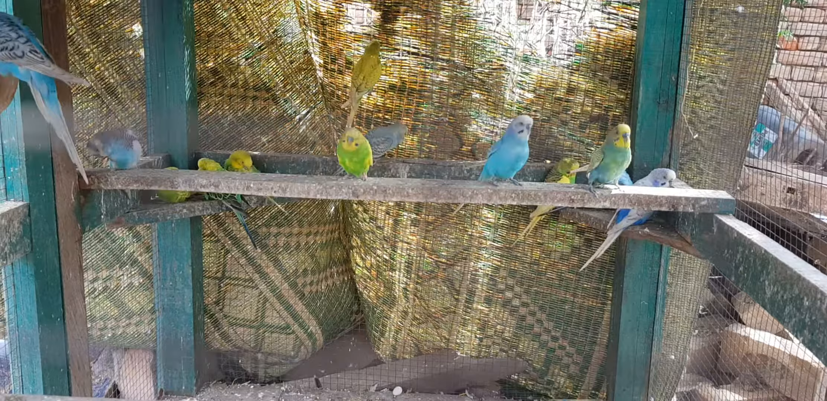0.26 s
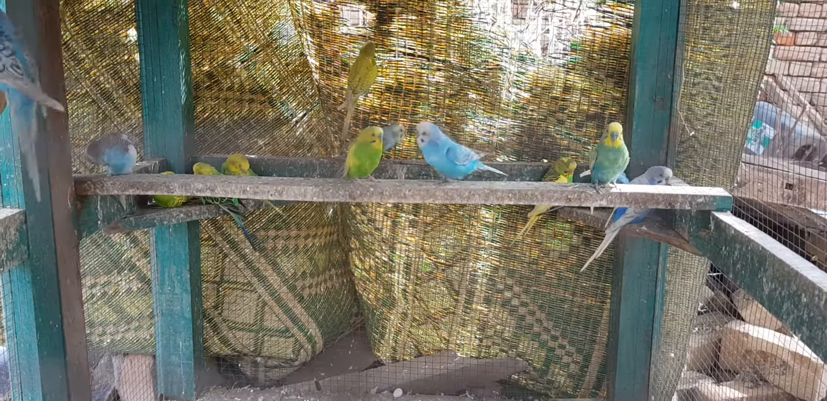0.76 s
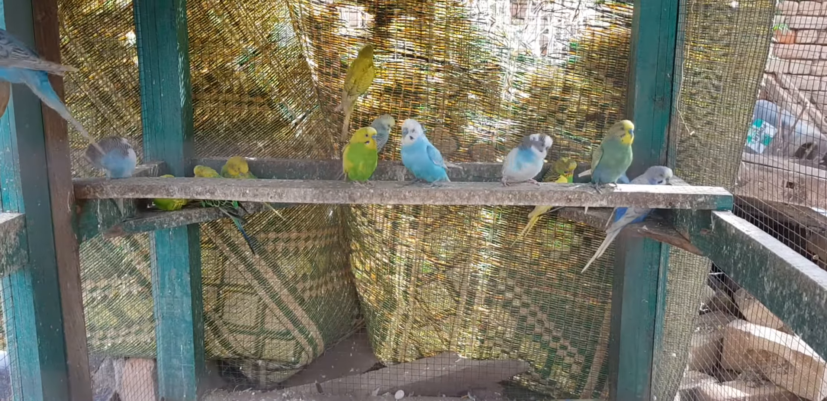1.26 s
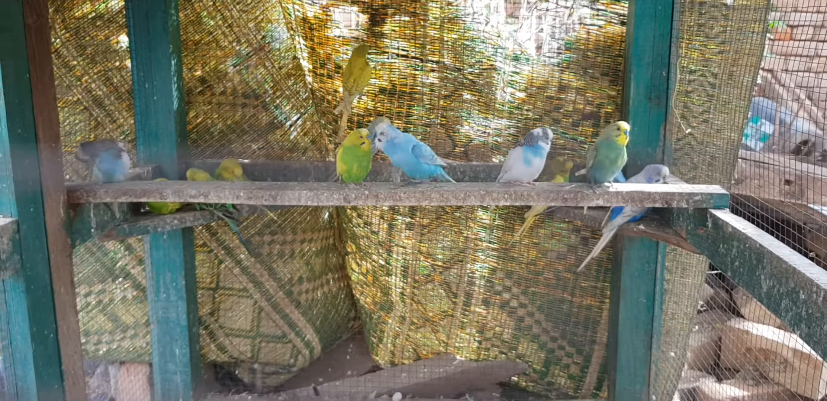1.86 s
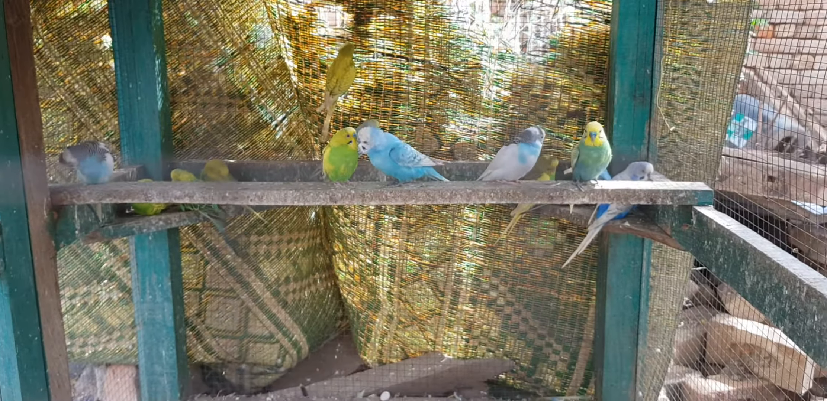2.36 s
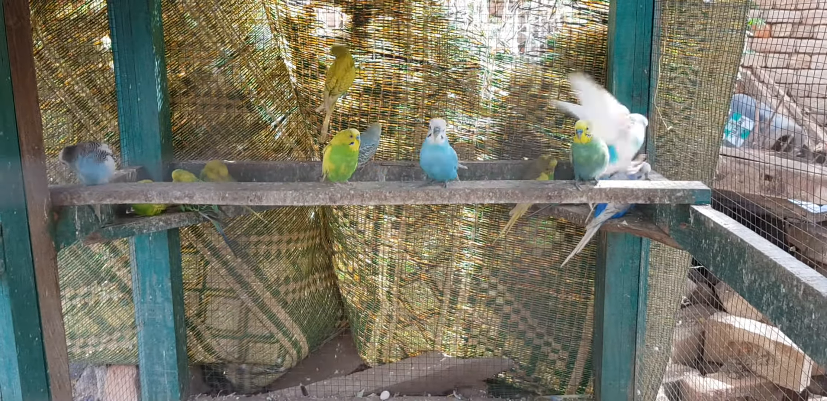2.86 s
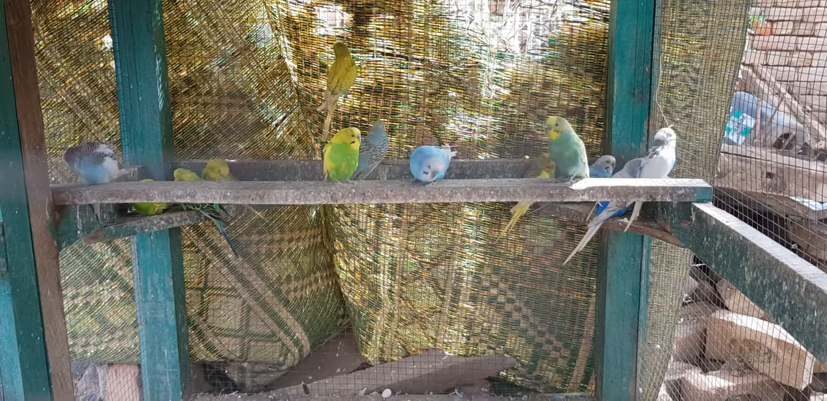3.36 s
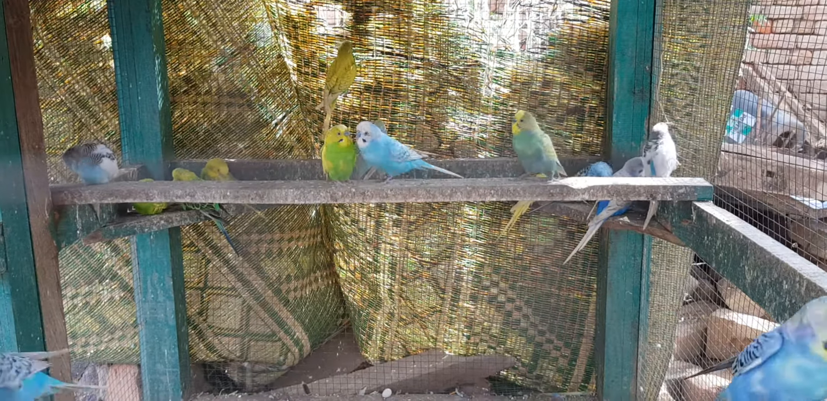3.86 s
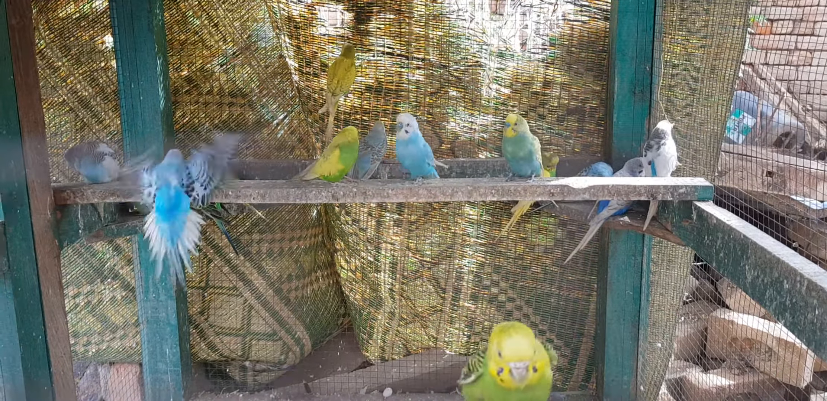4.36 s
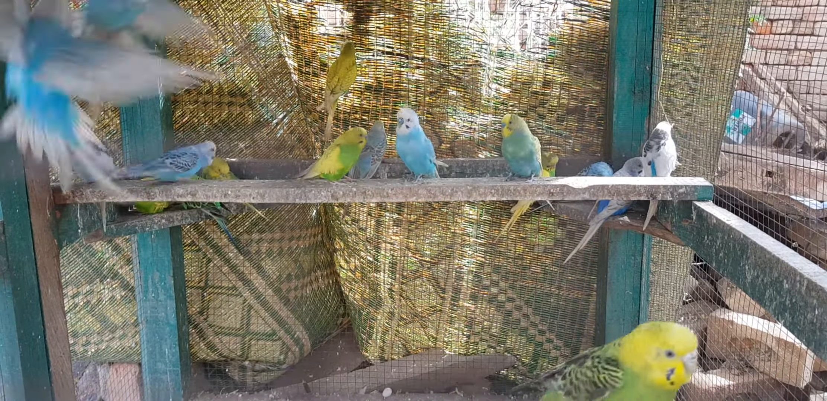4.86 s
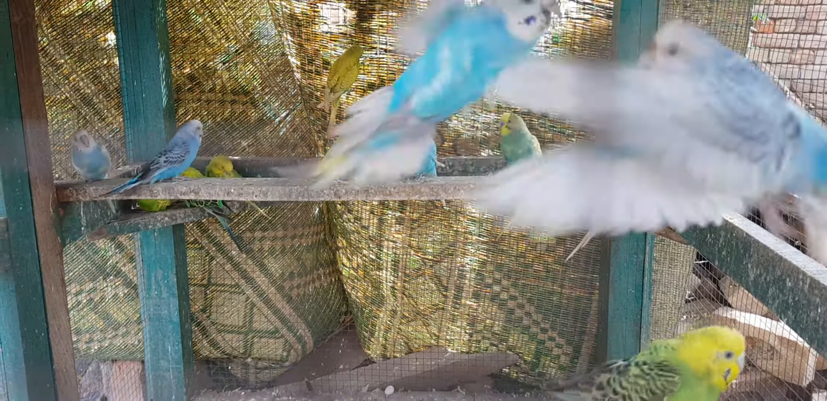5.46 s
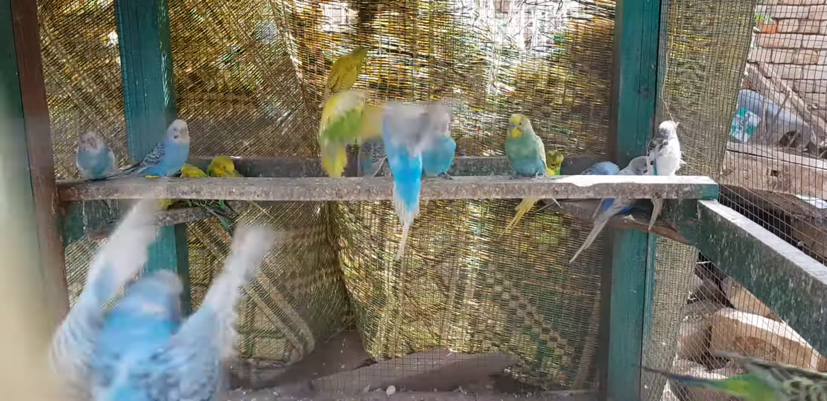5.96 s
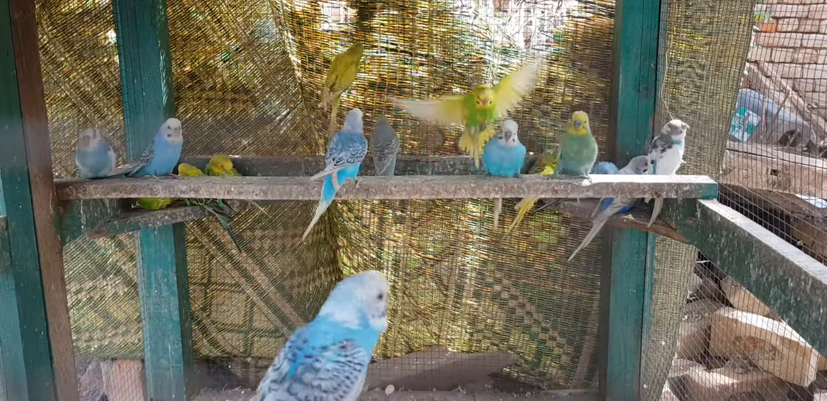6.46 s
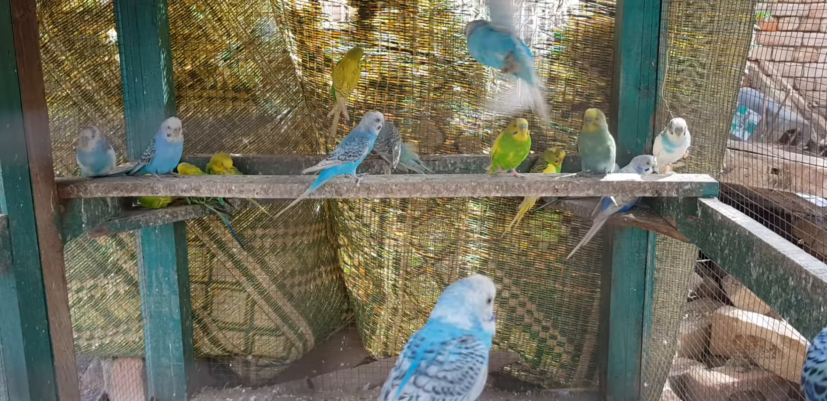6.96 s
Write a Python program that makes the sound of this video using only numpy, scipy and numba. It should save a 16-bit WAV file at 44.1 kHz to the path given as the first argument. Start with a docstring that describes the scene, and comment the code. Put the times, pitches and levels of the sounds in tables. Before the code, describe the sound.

A flock of small parakeets chatters in a wire aviary. Close birds give short buzzy whistles and throaty squawks, then a steady string of harsh scolds from about two to three seconds. The calls thin out to a lull, then birds flutter past very near with low air thumps and papery wing slaps. Sparse chirps and rasps return. Close stereo microphone, left side duller, little reverberation.

```python
"""Short buzzy whistles and hoarse scolds of small parrots in a wire aviary, over a warbling farther flock.
Whistles are gliding tones with overtones; rasps are air puffs rung through throat, beak and jet resonances.
The flock is many overlapping random notes with haze; noise bands make the air and feathers of birds flying
past, with low thumps and wing-tip slaps. A beak ticks and a landing shakes the perch.
Two ports pick it up; the left one is covered and dull."""
import sys
import numpy as np
from scipy import signal
from scipy.fft import rfft, irfft, next_fast_len
from scipy.io import wavfile
from scipy.ndimage import uniform_filter1d
from numba import njit

SR = 44100
rng = np.random.default_rng(int(sys.argv[2]) if len(sys.argv) > 2 else 0)


def wav_record(signal):
    """Record a signal, one row per channel, as 16-bit PCM in the file named by sys.argv[1]."""
    frames = np.transpose(np.atleast_2d(signal))
    bounded = np.clip(frames, -1, 1)
    # unit amplitude maps onto the largest positive 16-bit level
    quanta = np.round(bounded * 32767).astype(np.int16)
    wavfile.write(sys.argv[1], SR, quanta)


N = 318402


def undb(db):
    """Decibels to gain."""
    return 10 ** (np.asarray(db) / 20)


def unit(x):
    """Scale to rms 1."""
    return x / np.sqrt(np.mean(x ** 2))


def curve(table):
    """Columns of a table joined by straight lines in time."""
    s, *columns = np.transpose(table)
    return [np.interp(np.arange(N) / SR, s, c) for c in columns]


def walk(rate_hz):
    """Random levels held 1 / rate_hz seconds and slewed; rms 1."""
    hold = int(SR / rate_hz)
    steps = np.repeat(rng.standard_normal(N // hold + 1), hold)[:N]
    return unit(uniform_filter1d(uniform_filter1d(steps, hold), hold))


@njit
def svf(x, hz, width_hz):
    """State-variable band-pass whose centre may move, gain 1 at the centre."""
    y, b, l = np.empty(len(x)), 0., 0.
    for i in range(len(x)):
        g, k = np.tan(np.pi * hz[i] / SR), width_hz / hz[i]
        v = (b + g * (x[i] - l)) / (1 + g * (g + k))
        b, l, y[i] = 2 * v - b, l + 2 * g * v, k * v
    return y


def band(x, hz, width_hz):
    """A steep resonance: the band-pass twice, width_hz per pass."""
    hz = hz * np.ones(N)
    once = svf(x, hz, 1. * width_hz)
    return svf(once, hz, 1. * width_hz)


def colour(x, points):
    """Filter by (freq_hz, gain_db) points on a log-frequency axis."""
    size = next_fast_len(N)
    hz, db = np.transpose(points)
    bins_hz = np.arange(size // 2 + 1) * SR / size
    gain = undb(np.interp(np.log(bins_hz + 1), np.log(hz), db))
    return irfft(rfft(x, size) * gain, size)[:N]


def add(track, start_s, sound):
    """Mix a sound into a track at a time."""
    i = max(int(start_s * SR), 0)
    track[..., i:i + len(sound)] += sound[:N - i]


def swell(length_s, rise_s, fall_s):
    """Envelope with rounded rise and fall."""
    t = np.arange(int(length_s * SR)) / SR
    ramp = np.minimum(t / rise_s, (length_s - t) / fall_s)
    return np.sin(np.pi / 2 * np.clip(ramp, 0, 1)) ** 2


def aviary(x, t60_s=0.1):
    """Short scatter off posts, perches and a wall: decaying noise tails, different at each port."""
    t = np.arange(int(t60_s * SR)) / SR
    decay = np.exp(-np.log(1000) * t / t60_s)
    tails = rng.standard_normal((2, len(t))) * decay * (t > .002)
    tails = tails / np.sqrt(np.sum(tails ** 2, axis=1, keepdims=True))
    return signal.fftconvolve(x, tails, axes=1)[:, :N]


def whistles(rows, buzz, waver, overtone_db, edge_s):
    """Gliding tones, unsteady in pitch and unevenly buzzing; each reaches the left port at its own lag."""
    # microphone resonance near 13.7 kHz, gain over first overtone
    sheen_hz, sheen_spread_hz, sheen_gain = 13670, 1400, 0.43
    max_lag_s = 0.002044
    out, shake = np.zeros((2, N)), walk(170)
    buzz_hz = 160 * 2 ** (.5 * walk(40))
    throb = np.sin(2 * np.pi * np.cumsum(buzz_hz) / SR)
    draws = rng.random((len(rows), 2))
    for (s, length_s, a_hz, b_hz, c_hz, db), (depth, perch) in zip(rows, draws):
        env = swell(length_s + edge_s, edge_s, edge_s + 0.27 * length_s)
        u = np.linspace(0, 1, len(env))
        # parabola through start, middle and end pitch
        hz = a_hz * (1 - u) * (1 - 2 * u) + b_hz * 4 * u * (1 - u) + c_hz * u * (2 * u - 1)
        # high notes are rougher and purer, low notes smoother and rich in overtones
        height = min(b_hz / 3500, 1)
        span = (int(perch * N) + np.arange(len(u))) % N
        phase = 2 * np.pi * np.cumsum(hz * (1 + waver * height * shake[span])) / SR
        step = undb(overtone_db * height)
        tone = np.sin(phase)
        for k in range(2, 5):
            # overtones fade in steps, but stand out near the microphone resonance
            fade = step ** (k - 2) * (k * hz < SR / 2)
            sheen = sheen_gain * np.exp(-((k * hz - sheen_hz) / sheen_spread_hz) ** 2)
            tone = tone + step * (fade + sheen) * np.sin(k * phase)
        rough = 1 + buzz * height * depth * throb[span]
        note = np.sqrt(2) * undb(db) * env * rough * tone
        add(out[0], s - edge_s / 2 + max_lag_s * perch, note)
        add(out[1], s - edge_s / 2, note)
    return out


def chatter(low_hz, octaves, longest_s, glide, spread_db, count):
    """Random syllables, falling, rising or hooked, most of them falling, at scattered moments; rms 1."""
    s, length, pitch, fall, bend, size = rng.random((count, 6)).T
    hz = low_hz * 2 ** (octaves * pitch)
    start_hz = hz * (1 + glide * (fall - .35))
    middle_hz = hz * (1 + glide * (bend - .5) / 2)
    end_hz = hz * (1 - glide * (fall - .35))
    length_s = 0.00696 + longest_s * length ** 2
    level_db = -spread_db * np.log(size + 0.004)
    rows = np.transpose([s * N / SR, length_s, start_hz, middle_hz, end_hz, level_db])
    return unit(whistles(rows, buzz=1.0, waver=0.0307, overtone_db=-12.0, edge_s=.007))


def flock():
    """Many distant notes overlap into a warble with hoarse haze and hiss, its level dipping briefly."""
    # flock level: start_s, level_db
    flock_levels = [(0, -47.5), (1.5, -45), (2.4, -44), (3.0, -46.5), (3.4, -51), (4.5, -55.5), (4.9, -49),
                    (5.3, -42.5), (5.9, -48), (6.5, -45.5), (7.22, -45)]
    # brief dips of the flock: start_s, length_s
    dips = [(0.218, 0.2), (1.333, 0.051), (1.726, 0.056), (2.972, 0.049), (3.818, 0.049), (6.59, 0.089)]
    dip_db = -10.5
    notes = chatter(1500, 1.6, 0.0455, 0.2215, 2.95, count=1100)
    # soft, low whistles lie under them
    notes = notes + .09 * chatter(950, .35, .11, .25, 1.5, count=80)
    # from afar the scatter is strong
    notes = notes + 0.45 * aviary(notes, t60_s=0.3)
    haze = np.array([unit(band(rng.standard_normal(N), 2700, 3200)) for port in "LR"])
    haze = haze * undb(2.5 * walk(30))
    hiss = np.array([unit(band(rng.standard_normal(N), 10600, 12000)) for port in "LR"])
    level_db = curve(flock_levels)[0]
    for s, length_s in dips:
        add(level_db, s, dip_db * swell(length_s, 0.013, 0.0012))
    return undb(level_db) * (undb(-2.5) * notes + undb(-10.0) * haze + undb(-24.5) * hiss)


def wing_thumps():
    """Even downstrokes of a close pass push and pull the air, loudest as the bird is nearest."""
    pass_s, stroke_s = 5.65, .0565
    pass_db, fade_db_per_s2 = -16, 415
    thumps, t = np.zeros(N), np.arange(-900, 900) / SR
    late_s = stroke_s * (np.arange(6) - 2.8)
    levels_db = pass_db - fade_db_per_s2 * late_s ** 2
    draws = rng.random((len(late_s), 2))
    for s, db, (pitch, turn) in zip(pass_s + late_s, levels_db, draws):
        cycle = np.sin(2 * np.pi * ((58 + 20 * pitch) * t + 0.37 * turn))
        add(thumps, s + t[0], undb(db) * np.exp(-(t / 0.0087) ** 2) * cycle)
    # the left port hears them 90 samples later
    return np.array([np.roll(thumps, 90), thumps])


def wing_slaps(air):
    """Wing tips slap: broadband noise under a sudden attack and a two-stage decay."""
    # slaps: start_s, level_db
    slap_rows = [(4.607, -44), (4.773, -36.5), (4.825, -30), (4.874, -35), (4.898, -35), (4.949, -35),
                 (5.0644, -30), (5.093, -28.5), (5.3498, -24), (5.4122, -24.5), (5.467, -29.5),
                 (5.5767, -39), (5.63, -32), (5.685, -35.5), (5.8446, -36), (5.987, -34.5)]
    slaps, t = np.zeros(N), np.arange(2000) / SR
    for s, db in slap_rows:
        add(slaps, s, undb(db) * (np.exp(-t / 0.0022) + .5 * np.exp(-t / 0.012)))
    crack = unit(np.array([band(a, 11300, 38000) for a in air]))
    return undb(-7.0) * slaps * crack


def wings():
    """Downwash buffets the ports and feathers rush, pulsing with the strokes; close strokes thump and slap."""
    # birds on the wing: start_s, nominal length_s, downwash_db, feather rush above downwash_db
    flights = [(0, 0.2, -64.5, -5), (0.535, 0.1, -52.5, -17), (0.764, 0.042, -57.5, -10),
               (0.841, 0.15, -57.5, -12.5), (1.024, 0.06, -58, -11), (1.153, 0.04, -58.5, -11),
               (1.241, 0.19, -63, 1), (3.555, 0.22, -47.5, -12.5), (3.905, 0.3, -51, -9.5),
               (4.227, 0.2, -56, -5), (4.774, 0.29, -42.5, -8.5), (5.076, 0.52, -39.5, -8.5),
               (5.481, 0.37, -38, -10.5), (5.825, 0.28, -46.5, -10.5), (6.17, 0.44, -57, -6),
               (6.711, 0.44, -55, -5)]
    still_wash_db, still_rush_db = -71, -83  # always present
    wash_gain, rush_gain = np.zeros(N), np.zeros(N)
    for s, length_s, db, rush_db in flights:
        env = swell(1.38 * length_s, 0.022, 0.74 * length_s)
        add(wash_gain, s, undb(db) * env)
        add(rush_gain, s, undb(db + rush_db) * env)
    stroke_hz = 18 * (1 + 0.1477 * walk(2.4))
    beat = np.cos(2 * np.pi * np.cumsum(stroke_hz) / SR)
    stroke = undb(3.28 * beat + 2.0 * walk(30))
    shared, own = rng.standard_normal(N), rng.standard_normal((2, N))
    air = shared + 0.84 * own
    # the slowest eddies break differently on each port
    wash = unit(np.array([band(a + 0.15 * b, 62, 90) + undb(-11) * band(a, 146.5, 136)
                          for a, b in zip(air, own)]))
    rush = unit(np.array([band(a, 408, 168) + undb(-13.5) * band(a, 544, 840)
                          + undb(-20.5) * band(a, 12400, 8600) for a in air]))
    out = (stroke * wash_gain + undb(still_wash_db)) * wash
    out = out + (stroke * rush_gain + undb(still_rush_db)) * rush
    return out + wing_thumps() + wing_slaps(own)


def knocks():
    """A beak ticks as a decaying sine; a landing bird rings the wooden perch as decaying noise bands."""
    # beak ticks: start_s, level_db
    ticks = [(0.046, -17.5), (1.4234, -55), (1.435, -30.5), (1.4644, -44), (1.4755, -34), (1.4995, -37),
             (1.527, -33.5)]
    # perch resonances: freq_hz, width_hz, level_db, decay_s
    perch_modes = [(252, 107, -2.5, 0.039), (119, 28, -7, 0.084), (775, 430, -20, 0.053)]
    tick_hz, tick_rise_s, tick_decay_s = 6260, 0.00044, 0.0063
    landing_s, landing_db = .524, -41
    out, t = np.zeros(N), np.arange(N) / SR
    tick_t = t[:900]
    tick_env = np.exp(-tick_t / tick_decay_s) * np.minimum(tick_t / tick_rise_s, 1)
    tick = tick_env * np.sin(2 * np.pi * tick_hz * tick_t)
    for s, db in ticks:
        add(out, s, undb(db) * tick)
    since = np.maximum(t - landing_s, 0)
    for hz, width_hz, db, decay_s in perch_modes:
        env = (since > 0) * np.exp(-since / decay_s)
        out += undb(landing_db + db) * env * unit(band(rng.standard_normal(N), hz, width_hz))
    return out


def rasps():
    """Puffs, about 260 a second, ring throat, beak and air jet; squawks add a voice of short syllables."""
    # harsh open-beaked scolds: start_s, length_s, level_db
    scolds = [(0.601, 0.067, -34), (0.987, 0.025, -35.5), (1.414, 0.13, -46), (1.962, 0.066, -24),
              (2.084, 0.067, -23), (2.151, 0.065, -22), (2.218, 0.084, -25), (2.366, 0.072, -24),
              (2.492, 0.064, -24.5), (2.619, 0.063, -24.5), (2.747, 0.058, -23.5), (2.884, 0.061, -24.5),
              (3.025, 0.0086, -42), (3.071, 0.056, -25), (3.247, 0.066, -26), (3.488, 0.008, -52.5),
              (4.176, 0.028, -45.5), (4.241, 0.018, -45.5), (4.994, 0.063, -38.5), (5.113, 0.068, -30.5),
              (5.231, 0.078, -35.5), (6.689, 0.034, -35), (6.945, 0.043, -31), (7.055, 0.085, -29.5)]
    # hoarse throaty squawks: start_s, length_s, level_db
    squawks = [(0.033, 0.078, -27.5), (0.111, 0.095, -29.5), (0.322, 0.044, -34), (0.354, 0.081, -25.5),
               (0.432, 0.12, -28.5), (0.553, 0.045, -23), (0.624, 0.092, -33.5), (0.859, 0.057, -33.5),
               (0.932, 0.059, -40), (1.034, 0.059, -28.5), (1.545, 0.13, -28), (1.674, 0.04, -27),
               (1.78, 0.022, -32.5), (1.808, 0.071, -34), (1.841, 0.076, -33), (3.733, 0.02, -46),
               (3.751, 0.072, -47.5), (3.8, 0.0093, -45), (3.873, 0.027, -38.5), (3.881, 0.064, -38.5),
               (3.962, 0.012, -39.5), (5.382, 0.072, -38), (5.5, 0.052, -39), (5.541, 0.05, -34.5),
               (5.623, 0.051, -33), (5.743, 0.052, -42.5), (5.884, 0.036, -36), (5.973, 0.095, -48),
               (6.255, 0.0069, -28.5), (6.278, 0.037, -26), (6.296, 0.097, -30), (6.438, 0.06, -47),
               (6.505, 0.024, -36), (6.549, 0.07, -41), (6.76, 0.14, -30.5)]
    # throat resonances: freq_hz, width_hz, level_db
    throat_modes = [(2454, 630, 3.5), (3840, 820, 10)]
    # beak resonances: freq_hz, width_hz, level_db
    beak_modes = [(6325, 1220, 0), (6960, 920, -9)]
    # air jet resonance: freq_hz, width_hz, level_db
    jet_modes = [(11560, 6000, 5.5)]
    # throat of a scolding bird: freq_hz, width_hz
    gape_mode = (4370, 1240)
    # narrow hiss at the height of a scold: freq_hz, width_hz
    wheeze_mode = (12040, 1040)
    # weaker resonances, relative to the call level
    scold_throat_db, scold_gape_db, squawk_hiss_db, squawk_beak_db = -11.5, -10.5, -7.5, -13
    wheeze_db = -12
    max_rise_s, snap_per_s = .028, 6.8  # short calls break out suddenly

    phase = np.cumsum(260 * (1 + 0.28 * walk(120))) / SR % 1
    air = rng.standard_normal(N) + 1.09 * rng.standard_normal((2, N))
    clicks = unit((np.diff(phase, prepend=0) < 0) * undb(2.9 * rng.standard_normal(N)))
    puffs = (0.75 + np.exp(-phase / 0.31)) * air + 0.45 * clicks

    envs, wheeze_gain = np.zeros((5, 1, N)), np.zeros(N)
    for (s, length_s, db), mood in zip(scolds, rng.standard_normal(len(scolds))):
        hiss_db = db + wheeze_db + 0.9 * (db + 27) + 3.8 * mood
        add(wheeze_gain, s, undb(hiss_db) * swell(length_s, 0.92 * length_s, 0.67 * length_s))

    # calls: start_s, length_s, voice_db, throat_db, gape_db, beak_db
    calls = [(s, length_s, -np.inf, db + scold_throat_db, db + scold_gape_db, db)
             for s, length_s, db in scolds]
    calls += [(s, length_s, db, db + squawk_hiss_db, -np.inf, db + squawk_beak_db)
              for s, length_s, db in squawks]
    for s, length_s, voice_db, throat_db, gape_db, beak_db in calls:
        rise_s = min(max_rise_s, snap_per_s * length_s ** 2)
        env = swell(length_s + rise_s / 3 + 0.012, rise_s, min(0.038, length_s))
        # the harder the call, the stronger the jet
        jet_db = beak_db - 5.5 + 0.098 * (beak_db + 12)
        for track, part_db in zip(envs, (voice_db, throat_db, gape_db, beak_db, jet_db)):
            add(track, s - rise_s / 3, undb(part_db) * env)

    def ring(modes):
        """Puffs at each port through parallel resonances; rms 1."""
        return unit(np.array([sum(undb(db) * band(p, hz, width_hz) for hz, width_hz, db in modes)
                              for p in puffs]))

    throat, beak, jet = ring(throat_modes), ring(beak_modes), ring(jet_modes)
    gape = unit(np.array([band(p, *gape_mode) for p in puffs]))
    voice = undb(-6.5) * chatter(2500, 1.05, 0.0122, 0.1675, 2.3, count=2600)
    # each part flickers on its own as the beak works
    flicker = undb(np.array([[depth_db * walk(50)] for depth_db in (2.6, 2.2, 6.0, 0.99, 4.1)]))
    wheeze_hz = wheeze_mode[0] * (1 + 0.038 * walk(25))
    wheeze = wheeze_gain * unit(np.array([band(p, wheeze_hz, wheeze_mode[1]) for p in puffs]))
    return wheeze + (flicker * envs * [voice, throat, gape, beak, jet]).sum(axis=0)


def chirps():
    """Whistles, loud near ones and faint farther ones, glide quickly at first, then settle."""
    # whistled notes: start_s, length_s, start_hz, end_hz, level_db
    chirp_rows = [(0.066, 0.014, 3150, 3160, -29), (0.089, 0.018, 4500, 4640, -31.5),
                  (0.097, 0.043, 4100, 3950, -27), (0.13, 0.051, 3020, 3470, -25.5),
                  (0.18, 0.024, 4930, 4590, -32), (0.283, 0.028, 4730, 3000, -43),
                  (0.373, 0.015, 4470, 4140, -28.5), (0.397, 0.016, 3720, 3820, -39),
                  (0.454, 0.035, 3800, 3970, -27), (0.489, 0.021, 4270, 4030, -22.5),
                  (0.508, 0.01, 3250, 3150, -26.5), (0.515, 0.039, 3800, 3680, -28),
                  (0.525, 0.016, 1950, 1870, -33.5), (0.549, 0.026, 3980, 3600, -19.5),
                  (0.776, 0.041, 3690, 3700, -42.5), (0.867, 0.071, 3080, 3050, -43),
                  (1.088, 0.035, 2970, 3340, -36), (1.113, 0.018, 3870, 3830, -30.5),
                  (1.204, 0.052, 3770, 3200, -45.5), (1.232, 0.035, 3300, 4610, -41.5),
                  (1.238, 0.061, 4830, 7650, -63), (1.279, 0.03, 2520, 2400, -37.5),
                  (1.557, 0.046, 4420, 3993, -27.5), (1.587, 0.039, 3720, 4630, -29),
                  (1.629, 0.015, 4154, 3770, -23.5), (1.636, 0.031, 3520, 3570, -28),
                  (1.638, 0.016, 1910, 1830, -36), (1.664, 0.032, 3950, 3610, -23.5),
                  (1.684, 0.015, 3280, 3180, -25), (1.787, 0.027, 4290, 3800, -34.5),
                  (1.817, 0.095, 3093, 2794, -31), (1.861, 0.028, 3416, 3220, -22.5),
                  (2.035, 0.069, 3160, 2740, -36.5), (2.288, 0.055, 2540, 1960, -41),
                  (2.36, 0.047, 1465, 2280, -44.5), (2.52, 0.21, 1200, 1118, -64),
                  (2.802, 0.14, 1162, 1064, -57), (2.854, 0.015, 2260, 2190, -41),
                  (3.023, 0.052, 3150, 3020, -41), (3.115, 0.016, 2270, 2340, -37.5),
                  (3.135, 0.041, 2520, 2244, -37), (3.164, 0.019, 4900, 3680, -44),
                  (3.203, 0.045, 3740, 3650, -44), (3.372, 0.088, 1224, 1014, -58.5),
                  (3.408, 0.062, 2156, 2083, -54.5), (3.485, 0.023, 3100, 3200, -46),
                  (3.594, 0.096, 1970, 1526, -53.5), (3.662, 0.03, 3350, 3250, -40),
                  (3.694, 0.039, 3080, 3160, -31.5), (3.732, 0.026, 2430, 1930, -37.5),
                  (3.751, 0.021, 1980, 3830, -39), (3.767, 0.024, 3580, 1764, -39.5),
                  (3.892, 0.031, 1835, 1585, -48), (3.923, 0.035, 1690, 1846, -48.5),
                  (3.933, 0.028, 3440, 3490, -46), (4.09, 0.016, 2450, 2230, -39),
                  (4.172, 0.018, 2300, 2520, -45.5), (4.191, 0.034, 2990, 3000, -46.5),
                  (4.202, 0.18, 1404, 1103, -64.5), (4.242, 0.08, 2390, 2360, -50),
                  (4.338, 0.12, 2290, 1695, -60), (4.403, 0.06, 2870, 2500, -62),
                  (4.448, 0.098, 1260, 1050, -56), (4.458, 0.55, 5070, 5040, -61.5),
                  (4.47, 0.075, 2455, 2180, -57), (4.543, 0.043, 2220, 1730, -55.5),
                  (4.596, 0.04, 2445, 2030, -49.5), (4.632, 0.051, 1980, 2480, -54),
                  (4.695, 0.066, 1800, 1534, -55), (4.743, 0.096, 2560, 2434, -54.5),
                  (4.782, 0.045, 1280, 1157, -54.5), (4.897, 0.029, 2420, 2340, -47.5),
                  (5.049, 0.059, 3980, 3500, -38.5), (5.083, 0.036, 3580, 2090, -41),
                  (5.169, 0.032, 2510, 3010, -34), (5.197, 0.02, 3460, 3280, -31.5),
                  (5.358, 0.02, 3440, 3680, -33), (5.378, 0.019, 2800, 1800, -39),
                  (5.409, 0.026, 2160, 3680, -38.5), (5.425, 0.019, 3940, 3730, -28.5),
                  (5.516, 0.056, 3100, 3840, -44), (5.568, 0.032, 2170, 3320, -35.5),
                  (5.587, 0.026, 3510, 3760, -28), (5.604, 0.037, 3500, 1670, -38),
                  (5.639, 0.023, 2040, 3720, -38), (5.655, 0.025, 4020, 3760, -29),
                  (5.754, 0.026, 3460, 3130, -38.5), (5.77, 0.046, 2830, 2520, -47),
                  (5.968, 0.023, 2890, 2800, -39.5), (6.033, 0.048, 2008, 3210, -41.5),
                  (6.063, 0.0095, 2880, 2680, -37), (6.262, 0.014, 4070, 4450, -34.5),
                  (6.279, 0.022, 4430, 5970, -34), (6.306, 0.0052, 3400, 3320, -26),
                  (6.311, 0.011, 4550, 3970, -30), (6.321, 0.014, 3250, 3590, -20.5),
                  (6.335, 0.018, 3430, 3220, -17), (6.355, 0.039, 3370, 3390, -28.5),
                  (6.423, 0.06, 2640, 2720, -49), (6.528, 0.026, 1950, 1620, -46.5),
                  (6.531, 0.023, 3370, 3730, -37.5), (6.553, 0.046, 2930, 3070, -35),
                  (6.6, 0.03, 3660, 4190, -38), (6.669, 0.014, 2190, 2710, -46),
                  (6.701, 0.051, 2690, 2360, -35.5), (6.833, 0.043, 5530, 4880, -31.5),
                  (6.884, 0.12, 2920, 2130, -44.5), (6.944, 0.16, 1267, 1152, -59)]
    glide_done = .68  # share of the glide that is over at the note's middle
    rows = [(s, length_s, a_hz, a_hz + glide_done * (c_hz - a_hz), c_hz, db)
            for s, length_s, a_hz, c_hz, db in chirp_rows]
    return whistles(rows, buzz=0.93, waver=0.0235, overtone_db=-23.0, edge_s=0.0044)


def scene():
    """Near and farther voices with the aviary's scatter, the flock behind, wings passing, knocks."""
    voices = chirps() + rasps()
    scatter = undb([[-2.5], [-17]]) * aviary(voices)  # left, right
    return voices + scatter + flock() + wings() + knocks()


def record(dry):
    """The covered port loses treble, both are coloured; loud peaks are rounded and the top is cut."""
    # extra response of the covered left port: freq_hz, gain_db
    covered = [(60, 3.5), (200, -0.5), (700, -8), (1300, -11), (2400, -16), (4400, -25.5), (8100, -40.5),
               (15000, -15.5)]
    # response of both ports: freq_hz, gain_db
    both_ports = [(24, -35), (45, 1.5), (200, 2), (700, 9), (1300, 9.5), (8100, 3.5)]
    top_hz = 15900
    ports = np.array([colour(dry[0], covered), dry[1]])
    ports = np.array([colour(port, both_ports) for port in ports])
    ports = .8 * np.tanh(ports / .8)
    low_pass = signal.ellip(10, .2, 80, top_hz, fs=SR, output="sos")
    return signal.sosfilt(low_pass, ports)


dry = scene()
out = record(dry)
wav_record(out)
```